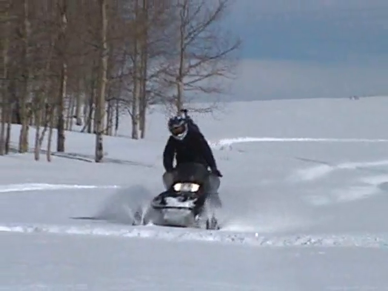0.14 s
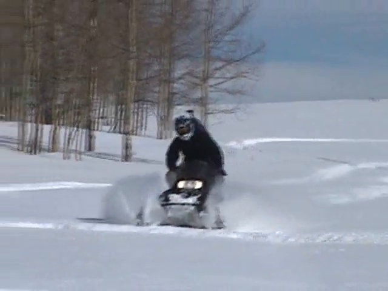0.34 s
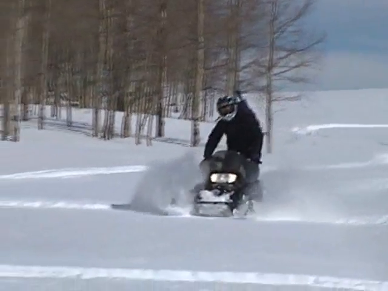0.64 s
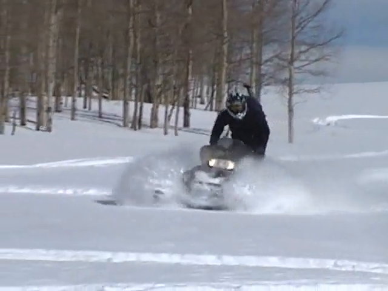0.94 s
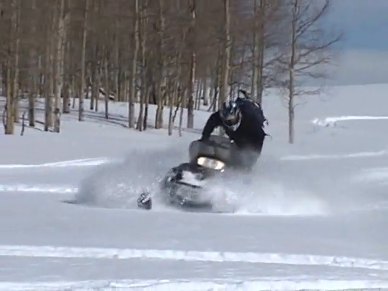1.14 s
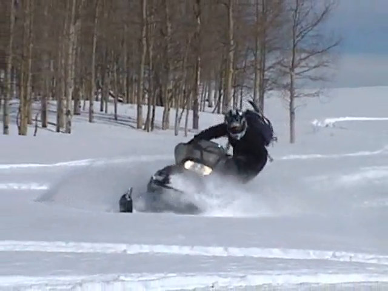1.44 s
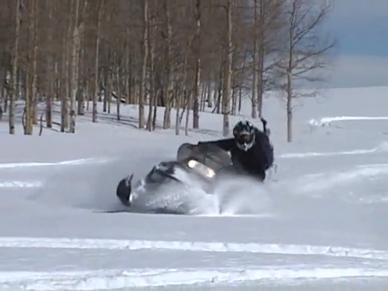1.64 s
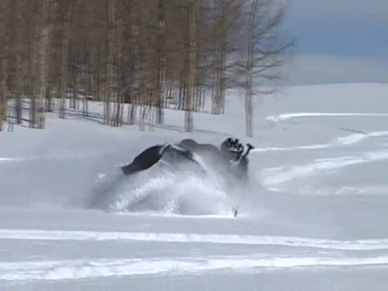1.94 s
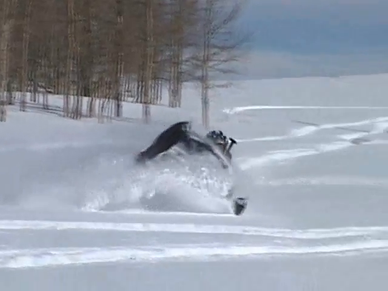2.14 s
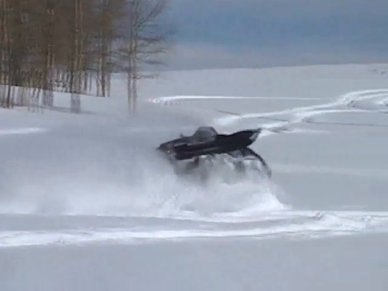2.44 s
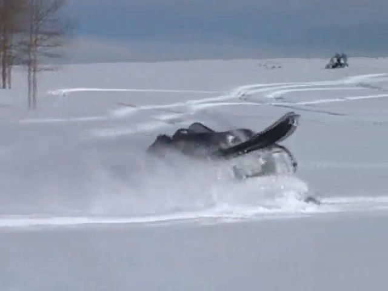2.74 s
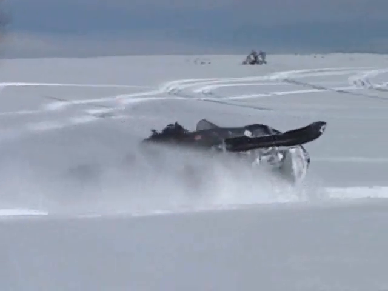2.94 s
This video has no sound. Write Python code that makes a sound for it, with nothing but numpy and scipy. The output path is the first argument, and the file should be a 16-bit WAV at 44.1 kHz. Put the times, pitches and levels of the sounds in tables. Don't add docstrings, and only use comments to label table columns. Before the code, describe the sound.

A two-stroke snowmobile labours in deep snow outdoors, muffled and ragged, revs dipping then climbing. As it rolls over, the exhaust bursts out far louder and holds a high, steady buzz, with light wind on the microphone.

```python
import sys
import numpy as np
from scipy import signal
from scipy.fft import rfft, irfft
from scipy.io import wavfile
from scipy.ndimage import uniform_filter1d

SR = 44100
rng = np.random.default_rng(int(sys.argv[2]) if len(sys.argv) > 2 else 0)


def undo_db(level):
    steps = np.asarray(level, float) / 20
    return 10 ** steps


def materialize(psi):
    bounded = np.clip(np.atleast_2d(psi).T, -1, 1)
    quanta = np.round(bounded * 32767).astype(np.int16)
    wavfile.write(sys.argv[1], SR, quanta)


N = 136710


def evened(x):
    return x / np.sqrt(np.mean(x ** 2) + 1e-20)


def noise():
    return rng.standard_normal(N)


def slow(hz):
    return evened(signal.sosfilt(signal.butter(2, hz, fs=SR, output="sos"), noise()))


def curves(table):
    times, *columns = np.transpose(table)
    t = np.arange(N) / SR
    return [uniform_filter1d(np.interp(t, times, c), size=1500, mode="nearest") for c in columns]


def read(points, hz):
    f, value = np.transpose(points)
    return np.interp(np.log(hz + 1), np.log(f + 1), value)


def coloured(x, points):
    return evened(irfft(rfft(x) * undo_db(read(points, np.fft.rfftfreq(N, 1 / SR))), N))


# (time [s], firing rate [1/s], blow level [dB],
# rattle level [dB], low throb level [dB], spray level [dB])
EFFORT = [(0, 195, -39.5, -30, -47, -52), (.15, 169, -35, -35.5, -40.5, -66),
          (.32, 157, -41.5, -33.5, -54, -43), (.7, 144, -38.5, -34, -53.5, -44),
          (.8, 147, -33.5, -34, -46.5, -41), (.92, 161, -39, -33.5, -48.5, -37.5),
          (1.1, 152, -36, -35, -43.5, -50), (1.31, 162, -37, -33, -40.5, -48.5),
          (1.42, 182, -32, -24, -39, -35), (1.51, 206, -32, -24, -37.5, -29),
          (1.63, 226, -39.5, -22.5, -38, -28.5), (1.77, 247, -22, -19, -33.5, -30),
          (1.83, 254.5, -8.5, -20, -33.5, -17.5), (1.92, 258.8, -14.5, -27.5, -38, -15.5),
          (2.08, 256.3, -12.5, -27, -44.5, -24.5), (2.3, 255.5, -12, -29, -39, -28.5),
          (2.65, 255, -12, -26.5, -36, -31), (2.86, 250, -13, -27, -34.5, -31.5),
          (3.1, 245.6, -13.5, -29.5, -34, -32)]
# (time [s], aspect [0 buried, 1 pipe facing, 2 side on, 3 turned away])
LIE = [
    (0, 0),
    (1.76, 0),
    (1.9, 1),
    (2.08, 1.1),
    (2.34, 2),
    (2.72, 2.15),
    (2.84, 2.8),
    (3.1, 3),
]


def engine():
    rate, blow_db, rattle_db, throb_db, spray_db = curves(EFFORT)
    aspect = curves(LIE)[0]
    free = np.clip(aspect, 0, 1)
    turns = np.cumsum(rate) / SR
    load = np.clip((np.arange(N) / SR - 0.34) / 0.11, 0, 1)
    gate = pulsing(turns)

    blowing = undo_db(blow_db) * exhaust(turns, free, aspect)
    singing = undo_db(blow_db - 3) * load * (1 - free) * hood(turns, rate)
    throbbing = np.sqrt(2) * undo_db(throb_db) * throb(turns, aspect, load)
    rattling = undo_db(rattle_db) * (rattle(gate, free, aspect) + undo_db(-1) * snow_wash())
    spraying = undo_db(spray_db) * snow_fizz(gate)
    return blowing + singing + throbbing + rattling + spraying + rumble(rate, free) + track(turns)


def exhaust(turns, free, aspect):
    echo_ms, echo_db = 0.7094, -11.5
    direct = body(bounce(blows(turns, free)), aspect)
    at = np.arange(N)
    echo = np.interp(at - echo_ms * SR / 1000, at, direct, left=0)
    return (direct + undo_db(echo_db) * echo) / np.sqrt(1 + undo_db(2 * echo_db))


def blows(turns, free):
    at = np.interp(np.arange(1, int(turns[-1])), turns, np.arange(N))
    early_late, weak_strong = rng.standard_normal((len(at), 2)).T
    loose = 1 - free[at.astype(int)]
    jitter = 0.003 + 0.015 * loose
    at = np.clip(at + early_late * jitter * np.gradient(at), 20, N - 20)
    twin_db = 0.16 * (-1) ** np.arange(len(at))
    size = undo_db(3.5 * weak_strong * loose + twin_db)
    k = np.arange(-16, 17)
    d = k - (at % 1)[:, None]
    click = np.sinc(0.8 * d) * np.cos(np.pi * d / 34) ** 2
    out = np.zeros(N)
    np.add.at(out, at.astype(int)[:, None] + k, -size[:, None] * click)
    return evened(out)


def bounce(x):
    taps = np.zeros(32)
    taps[[0, -1]] = 0.55, 1
    return signal.lfilter(taps, taps[::-1], x)


# (frequency [Hz], width [Hz], level in aspect 0 [dB], 1 [dB], 2 [dB], 3 [dB])
RESONANCES = [(664, 600, -17.5, -12, -32, -30), (1098, 104, -1.5, -2, -32.5, -25.5),
              (1248, 115, -7, 2, 5, 7), (1631, 236, -1, -16, 8, 7.5), (2036, 340, -5.5, -4, 5.5, 8),
              (2284, 160, -2.5, 10.5, 7, -6), (2521, 67, -7, 13, 6, 3.5), (3317, 270, -4, 9.5, 6, -0.5),
              (3830, 250, -11, 6, -2, -25), (4113, 94.6, -30.5, 0, 0, 5), (4720, 365, -20.5, 3.5, -2, -8.5),
              (5780, 430, -10.5, 4.5, -6, -14.5), (7520, 500, -20.5, 2, -15.5, -24),
              (9540, 1680, -29, -6, -20.5, -26)]


def body(x, aspect):
    hz = abs(np.fft.fftfreq(8192, 1 / SR))
    out = np.zeros(N)
    for k in range(4):
        power = 0
        for centre, width, *level_db in RESONANCES:
            power = power + undo_db(2 * level_db[k]) / (1 + (2 * (hz - centre) / width) ** 2) ** 1.37
        log_gain = np.log(power * (hz / (hz + 300)) ** 2 + 1e-9) / 2
        ring = np.fft.ifft(np.exp(np.conj(signal.hilbert(log_gain)))).real[:2048]
        share = np.clip(1 - abs(aspect - k), 0, 1)
        out += share * signal.oaconvolve(x, ring / np.linalg.norm(ring))[:N]
    return out


def hood(turns, rate):
    hood_hz, width_hz = 1150, 200
    out = np.zeros(N)
    for m in range(4, 10):
        gain = 1 / (1 + (2 * (m * rate - hood_hz) / width_hz) ** 2) ** 0.58
        out += undo_db(1.5 * slow(34)) * gain * np.sin(2 * np.pi * (m * turns + rng.random()))
    return out


# (multiple of firing rate, level in aspect 0 [dB], 1 [dB], 2 [dB], 3 [dB])
LOW_TONES = [(.5, -16.5, -26, -20, -19.5), (1, 2, 1.5, -1, -2.5), (2, -5, 3, 1, -1.5),
             (3, -6, 2.5, 1, -6.5), (4, -4.5, -2.5, 1.5, -5)]


def throb(turns, aspect, load):
    out = np.zeros(N)
    for m, *level_db in LOW_TONES:
        level = undo_db(np.interp(aspect, np.arange(4), level_db) + 1.3 * slow(9.8))
        tone = np.sin(2 * np.pi * (m * turns + rng.random()))
        out += (load if m > 1 else 1) * level * tone
    return out


def pulsing(turns):
    depth, fade = 0.35, 0.63
    return evened(1 - depth + depth * np.exp(-(turns % 1) / fade))


def rattle(gate, free, aspect):
    flutter = undo_db(slow(27) * (0.5 - 0.6 * free))
    return body(gate * flutter * noise(), aspect)


def rumble(rate, free):
    width_hz = 62
    spin = np.exp(2j * np.pi * np.cumsum(rate * 1.14) / SR)
    r = np.exp(-np.pi * width_hz / SR)
    band = 2 * (spin * signal.lfilter([1 - r], [1, -r], noise() / spin)).real
    return undo_db(-49.5) * evened(band) * (1 - 0.74 * free)


def track(turns):
    t = np.arange(N) / SR
    spin = np.clip(np.minimum(t - 1.58, 1.9 - t) / 0.08, 0, 1)
    return np.sqrt(2) * undo_db(-41 + 2.3 * slow(22)) * spin * np.sin(2 * np.pi * 0.76 * turns)


# (frequency [Hz], level per Hz [dB])
WASH_SPECTRUM = [(71, -32), (120, -13.5), (358, -14), (929, -3), (1070, -1.5), (2830, 0.5), (3330, 0.5),
                 (11500, -17), (15200, -50)]


def snow_wash():
    return coloured(undo_db(1.34 * slow(24)) * noise(), WASH_SPECTRUM)


# (frequency [Hz], level per Hz [dB])
FIZZ_SPECTRUM = [(3530, -10), (6000, 0.5), (6360, -3), (7460, -2), (9910, -7), (10500, -6.5),
                 (15200, -12.5)]


def snow_fizz(gate):
    return coloured(gate * undo_db(1.2 * slow(30)) * noise(), [(3000, -40), *FIZZ_SPECTRUM])


# (time [s], level [dB])
WIND_PUFFS = [
    (0, -61),
    (.3, -60),
    (.45, -48),
    (.68, -48),
    (.8, -47),
    (1.1, -51),
    (1.5, -53),
    (1.75, -45),
    (2.0, -60),
    (3.1, -59),
]


def wind():
    a, b = (undo_db(2.8 * slow(19)) * noise() for _ in range(2))
    low_band = signal.butter(2, [45.6, 114], "band", fs=SR, output="sos")
    same = 0.76
    puffs = signal.sosfilt(low_band, [0.554 * a, same * a + np.sqrt(1 - same ** 2) * b])
    return undo_db(curves(WIND_PUFFS)[0]) * evened(puffs)


# (frequency [Hz], level [dB])
BALANCE = [(60, -5), (110, -5.5), (200, -3), (380, -6.5), (690, -4.5), (1280, -2.5), (2360, -1.5),
           (4340, -1.5), (8010, 1), (14800, -0.5)]
# (frequency [Hz], phase [radians])
PHASE_LEAD = [(0, -0.23), (690, -0.21), (1290, 0.38), (3530, 0.31), (6370, -1.6), (7410, 1), (7840, 1),
              (8100, 1), (8350, 0.076), (9220, 0.49), (10800, -1.1), (11300, -0.12), (13100, 0.1),
              (14900, -0.0)]
# (frequency [Hz], likeness [0 to 1])
LIKENESS = [(60, 0.77), (130, 0.5), (290, 0.66), (640, 0.71), (1390, 0.98), (3060, 0.77), (6720, 1),
            (14800, 0.31)]


def ports(x):
    hz, t, z = signal.stft(x, SR, nperseg=1024)
    a, b = rng.standard_normal((len(t), len(hz), 2)).T
    unlike = np.sqrt(np.clip(1 - read(LIKENESS, hz), 0, 1) / 4)[:, None]
    apart = unlike * 0.62 * (a + 1j * b)
    lean = (undo_db(read(BALANCE, hz) / 2) * np.exp(0.5j * read(PHASE_LEAD, hz)))[:, None]
    both = np.array([z * (1 + apart) * lean, z * (1 - apart) / lean])
    return signal.istft(both, SR, nperseg=1024)[1][:, :N]


def scene():
    return ports(engine()) + wind()


def low_pass(x):
    return signal.sosfilt(signal.butter(12, 15360, fs=SR, output="sos"), x)


def record(dry):
    loud = np.clip(1.12 * 1.406 * np.tanh(dry / 1.818), -1, 1)
    treble_cut = signal.firwin(255, 15600, fs=SR)[None]
    mix = signal.oaconvolve(loud, treble_cut, "same")
    return low_pass(mix)


dry = scene()
out = record(dry)
materialize(out)
```